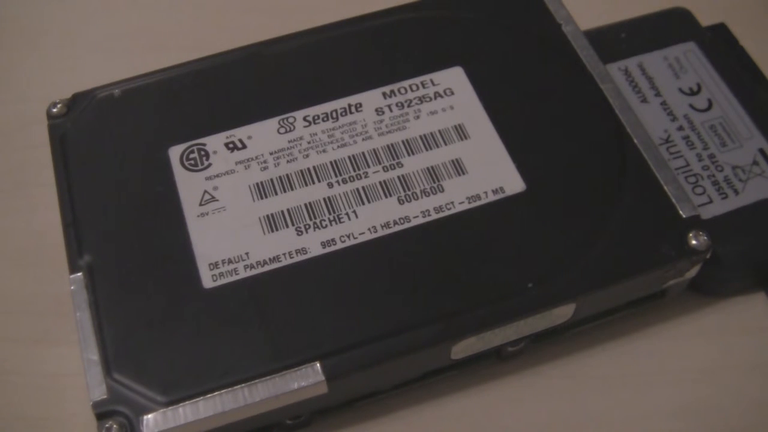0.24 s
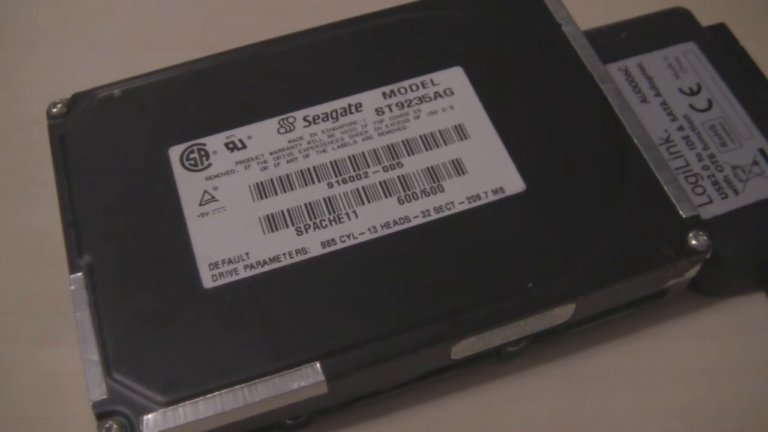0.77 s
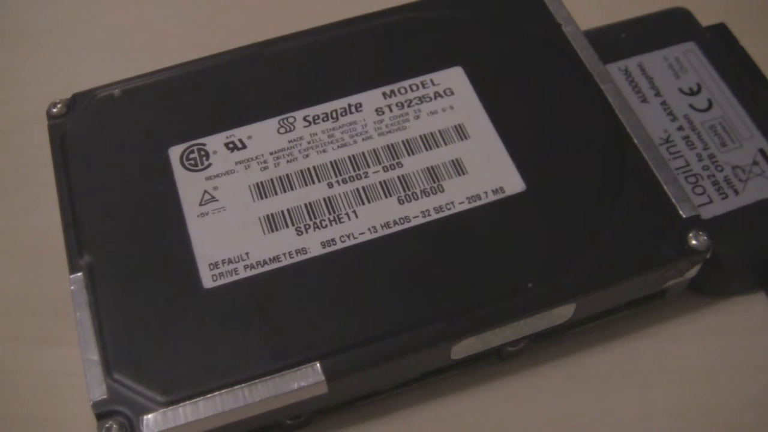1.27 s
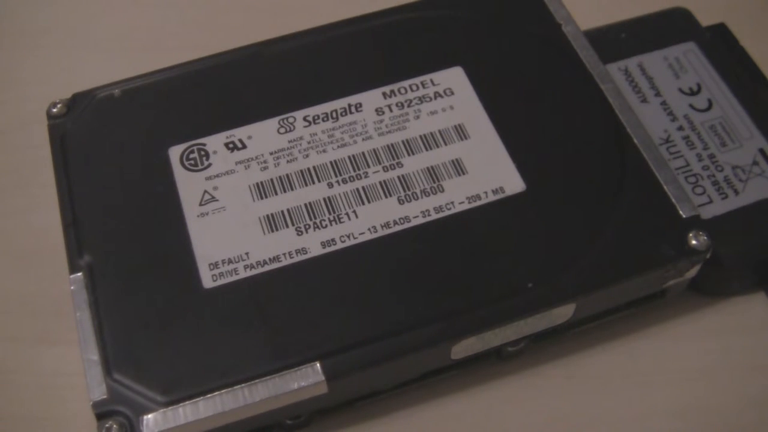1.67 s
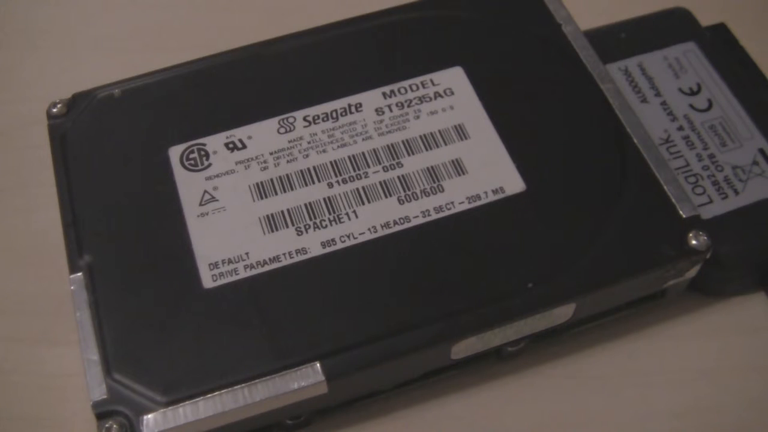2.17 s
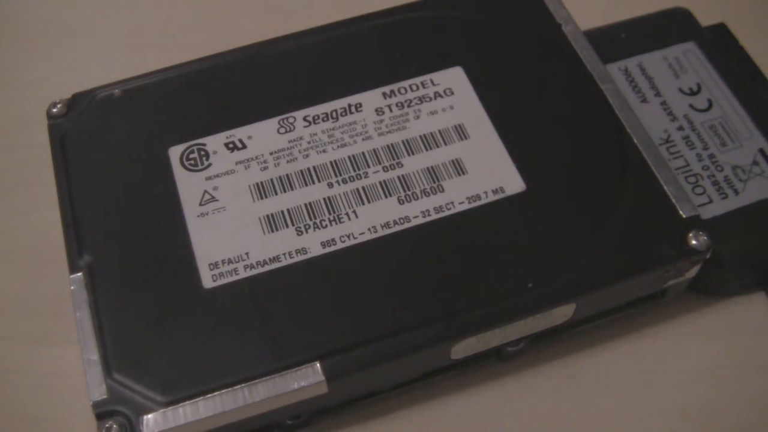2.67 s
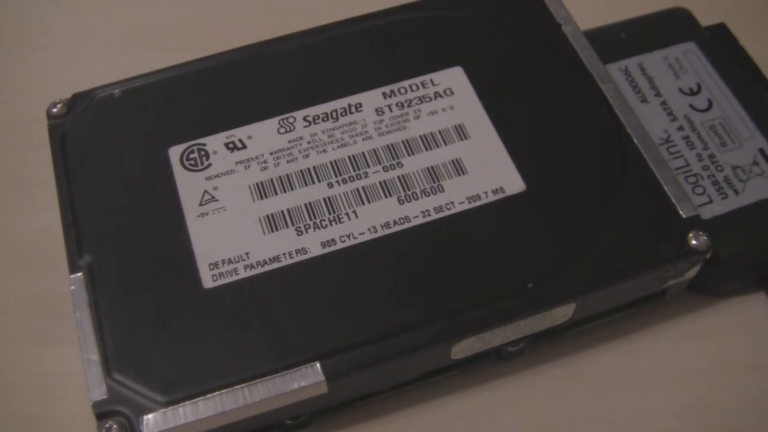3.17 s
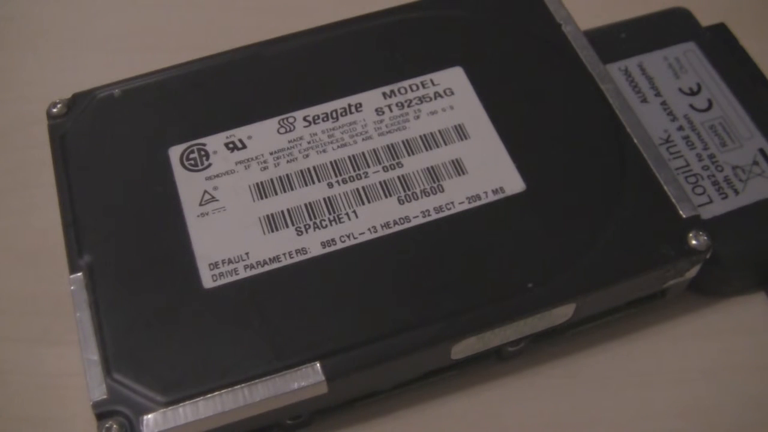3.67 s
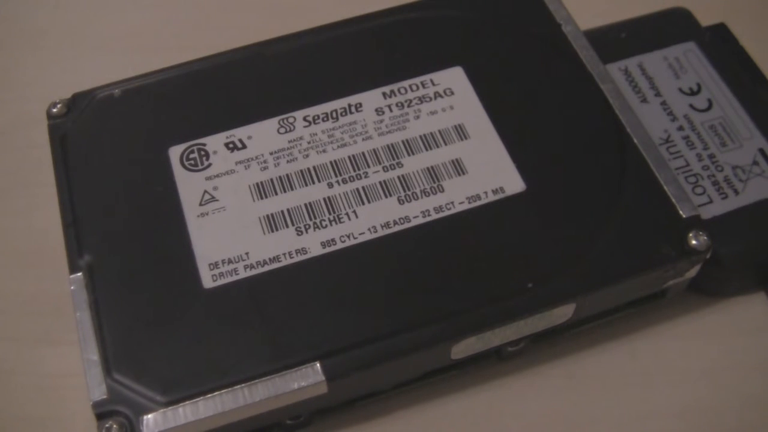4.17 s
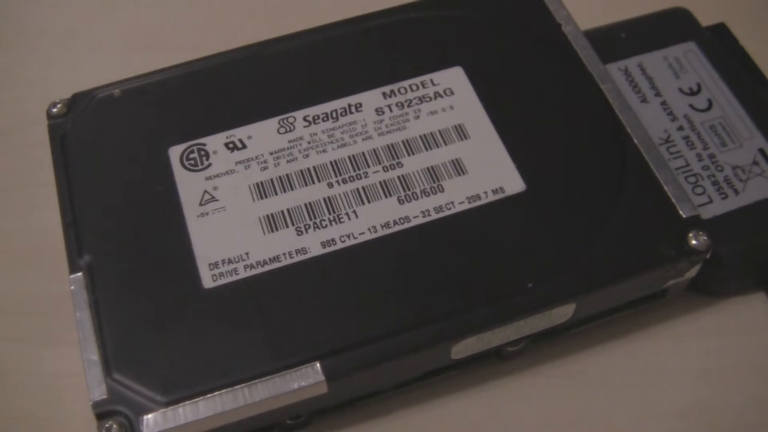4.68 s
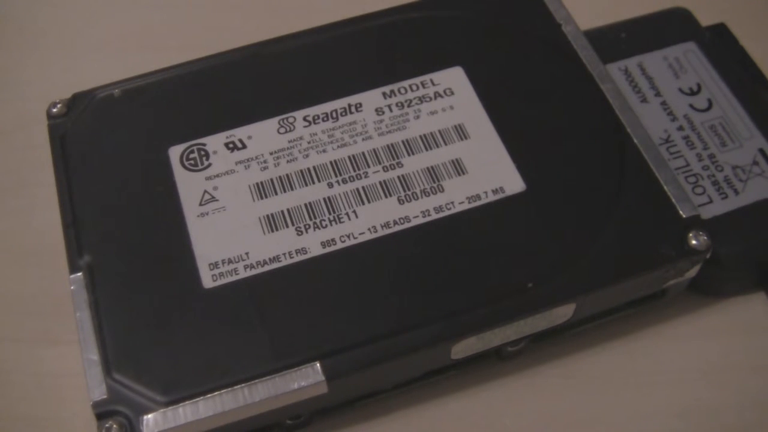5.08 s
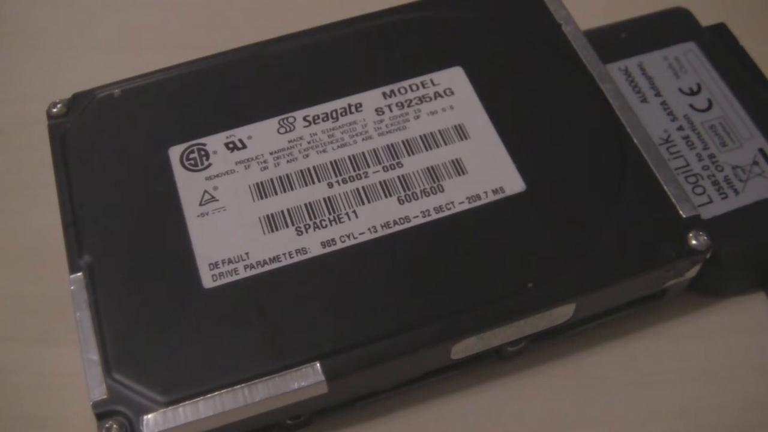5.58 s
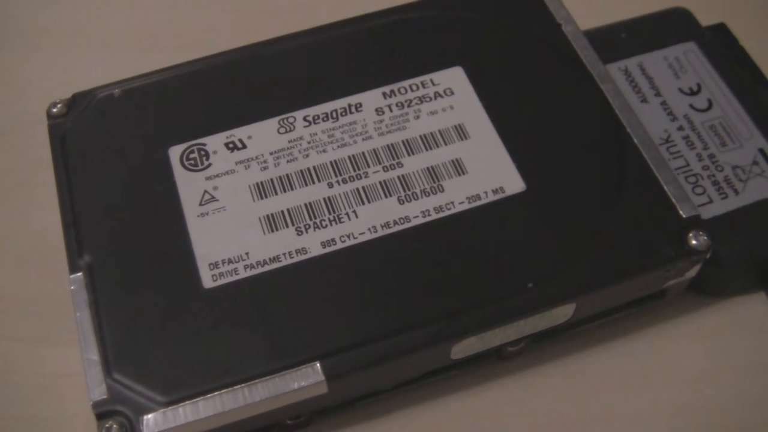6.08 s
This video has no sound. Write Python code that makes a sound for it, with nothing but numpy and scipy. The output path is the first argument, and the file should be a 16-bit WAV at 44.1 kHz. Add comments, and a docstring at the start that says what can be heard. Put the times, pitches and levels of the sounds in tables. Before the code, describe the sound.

The dense, high whine of a spinning hard drive in a quiet room, broken twice by a short pair of metallic knocks.

```python
"""A quiet room, a small hard drive spinning on a table close to a stereo microphone.
The two worn ball bearings of its spindle sing a dense comb of steady tones through the metal
housing, over motor tones and the hiss of air dragged by the platters. Twice the head arm swings
out and back, knocking on its stop each way and ringing arm, housing and table.
A few soft bumps come through the table, and the room hums beneath."""
import sys
import numpy as np
from scipy import signal
from scipy.fft import rfft, irfft
from scipy.io import wavfile
from scipy.ndimage import map_coordinates

SR = 44100
rng = np.random.default_rng(int(sys.argv[2]) if len(sys.argv) > 2 else 0)


def store_pcm(level_fs):
    """Save levels as 16-bit WAV."""
    pcm = np.round(np.clip(level_fs, -1, 1) * 32767).astype(np.int16)
    wavfile.write(sys.argv[1], SR, np.atleast_2d(pcm).T)


N = 279594
FFT_SIZE = 2 ** 19

SHAFT_HZ, BALLS = 57.5078, 7
UPPER, LOWER = 0, 1  # bearing numbers, as used in the tables
# per bearing: turn rate of the ball cage, and how often a ball's dent strikes a race
CAGE_HZ, STRIKE_HZ = (22.055, 22.0776), (223.64, 223.33)
BEAT_S = 10  # two dented balls at nearly one speed come back into step this often

# Levels are relative, ahead of the mix trims.
# turning-race tones with set levels: bearing, order, level/dB
TURNING_TONES = [(0, 35, -52), (0, 37, -52), (0, 49, -44), (0, 56, -45), (0, 70, -47), (0, 77, -43),
                 (0, 81, -47), (0, 83, -45), (0, 84, -46), (0, 89, -48), (0, 101, -38), (0, 103, -37),
                 (0, 104, -41), (0, 105, -32), (0, 106, -42), (0, 108, -42), (0, 110, -40), (0, 112, -41),
                 (0, 117, -46), (0, 119, -48), (0, 122, -48), (0, 123, -47), (0, 124, -46), (0, 125, -44),
                 (0, 143, -50), (0, 150, -49), (0, 146, -49), (0, 188, -51), (0, 192, -46), (0, 195, -47),
                 (0, 199, -44), (0, 200, -51), (1, 28, -51), (1, 76, -46), (1, 78, -44), (1, 82, -47),
                 (1, 85, -43), (1, 92, -42), (1, 97, -44), (1, 99, -39), (1, 102, -40), (1, 103, -45),
                 (1, 104, -45), (1, 121, -42), (1, 123, -46), (1, 124, -43), (1, 145, -49), (1, 157, -51),
                 (1, 159, -50), (1, 166, -48)]
# fixed-race tones with set levels: bearing, cage order, shaft turns added, level/dB
FIXED_TONES = [(0, 42, 0, -55), (0, 56, 1, -52), (0, 63, -1, -51), (0, 77, 0, -50), (0, 82, 1, -50),
               (0, 110, 1, -48), (0, 117, 1, -47), (0, 124, 1, -47), (0, 164, 1, -44), (0, 165, -1, -46),
               (0, 165, 1, -45), (0, 166, -1, -45), (0, 166, 1, -40), (0, 167, -1, -40), (0, 185, 0, -46),
               (0, 192, 0, -49), (0, 199, 0, -44), (1, 27, 1, -57), (1, 29, -1, -52), (1, 55, 1, -53),
               (1, 89, 0, -47), (1, 135, 1, -48), (1, 156, 1, -43), (1, 166, -1, -42), (1, 170, -1, -44),
               (1, 195, 0, -48)]
# loudest tones of dented balls: bearing, strike multiple, sideband, crest level/dB, crest t/s,
# relative size of the second ball's dent
DENT_TONES = [(0, 2, -1, -55, 0, .1), (0, 3, 1, -47, 7, .5), (0, 4, 0, -55, 3, .3), (0, 5, -1, -55, 3, .3),
              (0, 5, 1, -52, 0, .1), (0, 6, -1, -37.5, -1.9, .65), (0, 6, 0, -45, 1.8, .4),
              (0, 7, 0, -51, 3, .3), (0, 8, 0, -39, -1, .4), (0, 9, 0, -49, 3.5, .6),
              (0, 10, 0, -46, -.6, .4), (0, 11, -1, -44, .4, .7), (0, 11, 0, -41, 6, .7),
              (0, 11, 1, -39, -1, .9), (0, 12, 0, -42, 0, .7), (0, 12, 1, -33.5, 5.6, .8),
              (0, 13, 1, -40, 1.5, .7), (0, 14, 1, -42, -.4, .4), (0, 15, -1, -36, 7.8, .7),
              (0, 15, 1, -42, 7.8, .4), (0, 16, -1, -36, 1.6, .5), (0, 17, -1, -38, 3.8, .1),
              (0, 17, 1, -42, -.8, .7), (0, 18, 1, -44, 6.8, .7), (0, 19, 1, -45, 3.2, .7),
              (0, 20, 0, -41, 4, .9), (1, 6, -1, -44, 1.6, .4)]
# uneven seating in the cage, a row per bearing: lag/deg of each ball
BALL_LAGS = [(0, .831, 1.92, 1.039, .752, 1.45, -.423), (0, .198, -1.143, -1.276, -.135, 1.14, 1.52)]
# uneven loading, a row per bearing: relative load on each ball
BALL_LOADS = [(1, 1, .68, .72, .85, .89, .36), (1, .96, .72, .88, .94, 1.45, 1.6)]
# colour the housing gives the weaker tones: f/Hz, level/dB
HOUSING_EQ = [(250, -69.5), (450, -77.5), (750, -75.5), (1000, -69), (1200, -70), (1310, -58),
              (1430, -63.5), (1620, -60.5), (1850, -53.5), (2200, -57), (2600, -49.5), (3350, -49.5),
              (3650, -46), (3950, -53.5), (4300, -47.5), (4500, -49), (4800, -54.5), (5150, -55),
              (6000, -58.5), (6400, -62.5), (6850, -51), (7100, -56), (7500, -67.5), (9400, -78.5),
              (13000, -90)]
# the frame dulls fixed races and balls on their way to the housing: f/Hz, gain/dB
FRAME_EQ = [(800, 2), (1500, -2), (2000, -6), (3000, -10), (3650, -5), (4500, -10), (6000, -17),
            (9000, -11)]
# the head arm meets its stop: t/s, level/dB, brightness/(dB per octave), rasp/dB, rebound delay/ms,
# rebound share, ping/dB
ARM_KNOCKS = [(1.224, -3, 0.5, -27, 2.15, 0.59, -6.5), (1.3368, -3, -5, -41, 2.48, 0.073, -15),
              (5.7235, -3, 1, -30, 2.12, 0.5, -19), (5.8445, -4, -4.5, -37, 2.05, 0.3, -32)]
# ringing modes of arm, housing and table: f/Hz, level/dB, t60/s
KNOCK_MODES = [(525, -10.5, 0.63), (555, 6, 0.07), (591, -10, 0.57), (643, -13, 0.51), (703, -22, 0.65),
               (783, -10.5, 0.19), (833, 5.5, 0.059), (905, -12, 0.44), (964, -9, 0.74), (1028, 2, 0.1),
               (1077, -12, 0.15), (1257, 6, 0.031), (1377.5, 7, 0.024), (1700, -6, 0.055)]
# a thin part rings as the arm rebounds: f/Hz, delay/ms, t60/s
REBOUND_PING = (2520, 4.2, 0.015)
# the table top's slow answer to a knock: f/Hz, level/dB, t60/s
TABLE_MODE = (155.5, -30, 0.22)
# motor pole tones: shaft order, level/dB
POLE_TONES = [(12, -49), (18, -59), (36, -39), (90, -57), (168, -61)]
# low bearing hum: f/Hz, level/dB
BEARING_HUM = [(154.5, -63.5), (223.2, -70)]
# stereo width of the drive: f/Hz, side gain/dB
DRIVE_WIDTH = [(300, -8), (700, -10), (1500, -16.5), (3000, -12), (4500, -11), (6000, -11), (9000, -8)]
# hiss of air dragged by the platters: f/Hz, density/dB
AIR_SPECTRUM = [(600, -86), (1150, -85), (1450, -82), (2300, -78), (3600, -72), (4350, -75), (4800, -80.5),
                (6000, -83), (6400, -85), (6900, -79), (7400, -83), (8000, -90), (10000, -98),
                (15000, -112)]
# how centred that hiss is: f/Hz, left-right correlation
AIR_CORRELATION = [(600, 0.33), (5000, 1.0), (10000, 0.99), (13000, 0.16)]
# soft bumps through the table: t/s, level/dB, f/Hz, t60/s
TABLE_BUMPS = [(2.11, -34, 225, 0.17), (4.32, -46.5, 59.6, 0.43), (4.39, -40, 555, 0.32),
               (4.66, -44, 50.4, 0.34), (5.299, -42, 124, 0.25)]
# room tone: f/Hz, density/dB
ROOM_SPECTRUM = [(20, -112), (50, -81), (100, -78.5), (250, -72), (360, -78), (600, -75), (1200, -80.5),
                 (3000, -110), (9000, -102), (15000, -112)]
# how centred the room tone is: f/Hz, left-right correlation
ROOM_CORRELATION = [(25, 0.99), (100, 0.16), (400, 0.0), (2000, 0), (12000, 0.17)]


def bearings():
    """The main whine: races and dented balls of both bearings."""
    whine = turning_race(UPPER, level_db=-2.5, treble_db_per_octave=1.5)
    whine += turning_race(LOWER, level_db=-1.0, treble_db_per_octave=-5.5)
    whine += fixed_race(UPPER, level_db=-3.5) + fixed_race(LOWER, level_db=-4.5)
    whine += faint_strikes(UPPER, level_db=-1.5) + faint_strikes(LOWER, level_db=-6.5)
    return whine + dented_balls()


def turning_race(bearing, level_db, treble_db_per_octave):
    """Every ball rolls over the same dents each lap, so orders a ball count apart stay nearly in step."""
    order = np.arange(7, 380)
    hz = order * (SHAFT_HZ - CAGE_HZ[bearing])
    level_scatter, phase_scatter = rng.standard_normal((len(order), 2)).T
    db = curve(HOUSING_EQ, hz) + level_db + spacing_db(bearing, order)
    db += 7 * np.clip(level_scatter, -3, .6)
    db += treble_db_per_octave * np.maximum(np.log2(hz / 3600), 0)
    for which, tone_order, tone_db in TURNING_TONES:
        if which == bearing:
            db[order == tone_order] = tone_db
    looseness_rad = np.clip(3600 / hz, 0, 3)  # the treble is the most pulse-like
    phase = rng.uniform(0, 2 * np.pi, BALLS)[order % BALLS] + looseness_rad * phase_scatter
    return tones(hz, db, phase, slip_ms=0.039)


def fixed_race(bearing, level_db):
    """The fixed race repeats with the cage, rocked once a turn by the shaft."""
    order, turns = (grid.ravel() for grid in np.meshgrid(np.arange(20, 500), np.arange(-1, 2)))
    hz = order * CAGE_HZ[bearing] + turns * SHAFT_HZ
    level_scatter, phase_scatter = rng.standard_normal((len(hz), 2)).T
    db = curve(HOUSING_EQ, hz) + curve(FRAME_EQ, hz) + level_db + spacing_db(bearing, order)
    db += 10 * np.clip(level_scatter, -3, .9)
    for which, tone_order, tone_turns, tone_db in FIXED_TONES:
        if which == bearing:
            db[(order == tone_order) & (turns == tone_turns)] = tone_db
    return tones(hz, db, 10 * phase_scatter, slip_ms=0.033)


def spacing_db(bearing, order):
    """How well the balls add up on each order, given their seats and loads."""
    angle = 2 * np.pi * np.arange(BALLS) / BALLS + np.radians(BALL_LAGS[bearing])
    load = np.array(BALL_LOADS[bearing])
    power = abs(np.exp(1j * order[:, None] * angle) @ load) ** 2 / (load @ load)
    return 10 * np.log10(power + 0.07)


def dented_balls():
    """Two dented balls beat at nearly equal pitch, so each strike tone slowly swells and fades."""
    t = np.arange(N) / SR
    rolling_t = t + slip(ms=0.049)
    out = np.zeros(N)
    for bearing, multiple, sideband, db, crest_s, second_dent in DENT_TONES:
        beat = np.cos(2 * np.pi * (t - crest_s) / BEAT_S)
        swell = np.sqrt(1 + second_dent ** 2 + 2 * second_dent * beat) / (1 + second_dent)
        cycles = strike_hz(bearing, multiple, sideband) * rolling_t + rng.random()
        out += amp(db) * swell * np.sqrt(2) * np.sin(2 * np.pi * cycles)
    return out


def faint_strikes(bearing, level_db):
    """Weak strike partials of random size fill the comb between the loud ones."""
    hz = strike_hz(bearing, np.arange(2, 50)[:, None], np.arange(-3, 4)).ravel()
    level_scatter, phase_scatter = rng.standard_normal((len(hz), 2)).T
    db = curve(HOUSING_EQ, hz) + curve(FRAME_EQ, hz) + level_db + 6 * np.clip(level_scatter, -3, 1.5)
    loud_hz = [strike_hz(*row[:3]) for row in DENT_TONES]
    gap_hz = abs(hz[:, None] - loud_hz).min(1)
    db[gap_hz <= 1.5] -= 100  # keep clear of the loud tones
    return tones(hz, db, 10 * phase_scatter, slip_ms=0.15)


def strike_hz(bearing, multiple, sideband):
    """A ball strikes both races while carried through the load, which adds sidebands."""
    return multiple * STRIKE_HZ[bearing] + sideband * (SHAFT_HZ - CAGE_HZ[bearing])


def slip(ms):
    """Slow timing wander in seconds, scaled by ms, as rolling parts hurry and fall back."""
    t = np.arange(N) / SR
    sways = (np.sin(2 * np.pi * (hz * t + rng.random())) * .1 / hz for hz in np.geomspace(.1, 1.2, 6))
    return ms / 1000 * sum(sways)


def arm_knock(db, bright_db_per_octave, rasp_db, rebound_ms, rebound_share, ping_db):
    """The arm hits its stop: a ringing body, a rasp on top, the table below and a thin ping."""
    t = np.arange(SR // 2) / SR
    body = knock_body(t, bright_db_per_octave, rebound_ms, rebound_share)
    rasp = butter(rng.standard_normal(len(t)), 5, [6500, 11000], "band")
    rasp *= amp(rasp_db) * (t / 0.0017 * np.exp(1 - t / 0.0012) + 0.5 * np.exp(-t / 0.033))
    table = ring(t, *TABLE_MODE) * (1 - np.exp(-t / 0.0046))
    ping_hz, delay_ms, t60 = REBOUND_PING
    ping = ring(np.maximum(t - delay_ms / 1000, 0), ping_hz, ping_db, t60)
    return amp(db) * (body + rasp + table + ping)


def knock_body(t, bright_db_per_octave, rebound_ms, rebound_share):
    """A blow, two rebounds and a short chatter ring the modes."""
    hz, db, t60 = np.transpose(KNOCK_MODES)[:, :, None]
    polarity = (-1) ** np.round(hz / 250)  # neighbouring panels move in opposite senses
    modes = (polarity * ring(t, hz, db + bright_db_per_octave * np.log2(hz / 800), t60)).sum(0)
    blows = sum(size * np.exp(-((t[:600] - .0006 - k * rebound_ms / 1000) / 0.00004) ** 2)
                for k, size in enumerate([.7, -rebound_share, 0.52 * rebound_share]))
    hit = signal.fftconvolve(modes, blows)[:len(t)]
    rattle = rng.standard_normal(len(t)) * amp(-60 * t / 0.13) * (1 - np.exp(-t / 0.0023))
    chatter = signal.fftconvolve(modes, rattle)[:len(t)]
    body = hit / abs(hit).max() + amp(-12) * chatter / abs(chatter).max()
    body *= amp(-60 * np.maximum(t - 0.085, 0) / 0.12)  # the ring dies away quickly after 85 ms
    return butter(body, 4, 430, "high")  # too small to radiate bass


def steady_tones():
    """Motor pole tones locked to the shaft and a low bearing hum, all free of slip."""
    poles = [(order * SHAFT_HZ, db) for order, db in POLE_TONES]
    hz, db = np.transpose(poles + BEARING_HUM)
    return tones(hz, db, rng.uniform(0, 2 * np.pi, len(hz)), slip_ms=0)


def table_echoes(mono):
    """Echoes off the table reach the two capsules a little differently and widen the drive."""
    echoes = rng.standard_normal(1024) * np.exp(-np.arange(1024) / 49.0)
    echoes /= np.linalg.norm(echoes)
    hz = np.fft.rfftfreq(FFT_SIZE, 1 / SR)
    quadrature = 1j * rfft(echoes, FFT_SIZE).imag  # the capsules differ in phase, hardly in level
    side = irfft(rfft(mono, FFT_SIZE) * quadrature * amp(curve(DRIVE_WIDTH, hz)))[:N]
    return np.array([mono + side, mono - side])


def table_bump(db, hz, t60):
    """A soft thud through the table: one pitch in a dull puff of noise."""
    t = np.arange(SR // 3) / SR
    puff = butter(rng.standard_normal(len(t)), 2, [0.62 * hz, 1.66 * hz], "band")
    envelope = amp(db - 60 * t / t60) * (1 - np.exp(-t / 0.0029))
    return envelope * (np.sin(2 * np.pi * hz * t) + puff / puff.std())


def noise_bed(spectrum, correlation):
    """Steady stereo noise for platter air or room tone, partly shared by left and right."""
    hz = np.fft.rfftfreq(FFT_SIZE, 1 / SR)
    left, independent = rfft(rng.standard_normal((2, FFT_SIZE)))
    shared = np.clip(curve(correlation, hz), 0, 1)
    right = shared * left + np.sqrt(1 - shared ** 2) * independent
    return irfft(np.array([left, right]) * amp(curve(spectrum, hz)) * np.sqrt(SR / 2))[:, :N]


def tones(hz, db, phase, slip_ms):
    """A bank of steady sines of rms level db that slip together."""
    spectrum = np.zeros(FFT_SIZE // 2 + 1, complex)
    bins = np.round(hz * FFT_SIZE / SR).astype(int)
    np.add.at(spectrum, bins, amp(db) * np.exp(1j * phase) * FFT_SIZE / np.sqrt(2))
    playhead = np.arange(N) + SR + slip(slip_ms) * SR
    return map_coordinates(irfft(spectrum), [playhead], order=3)


def ring(t, hz, db, t60):
    """A struck mode: a sine that falls 60 dB in t60 seconds."""
    return amp(db - 60 * t / t60) * np.sin(2 * np.pi * hz * t)


def butter(sound, order, hz, kind):
    return signal.sosfilt(signal.butter(order, hz, kind, fs=SR, output="sos"), sound)


def curve(points, hz):
    """Read a breakpoint curve along a log frequency axis."""
    point_hz, value = np.transpose(points)
    return np.interp(np.log(hz + 1), np.log(point_hz + 1), value)


def amp(db):
    return 10 ** (np.asarray(db) / 20)


def add(mix, start_s, sound):
    part = mix[round(start_s * SR):][:len(sound)]
    part += sound[:len(part)]


def scene():
    """Drive and air up close, bumps in the centre, room tone underneath."""
    drive = amp(-0.32) * (bearings() + steady_tones())
    for start_s, *knock in ARM_KNOCKS:
        add(drive, start_s, arm_knock(*knock))
    bumps = np.zeros(N)
    for start_s, *bump in TABLE_BUMPS:
        add(bumps, start_s, table_bump(*bump))
    close = table_echoes(drive) + noise_bed(AIR_SPECTRUM, AIR_CORRELATION)
    close *= amp([[-.55], [.55]])  # a touch to the right
    return close + bumps + noise_bed(ROOM_SPECTRUM, ROOM_CORRELATION)


def record(dry):
    """The recorder's band limit: a steep cut above 15 kHz."""
    lowpass = signal.firwin(511, 15000, window=("kaiser", 9), fs=SR)
    return signal.oaconvolve(dry, lowpass[None], "same")


dry = scene()
out = record(dry)
store_pcm(out)
```